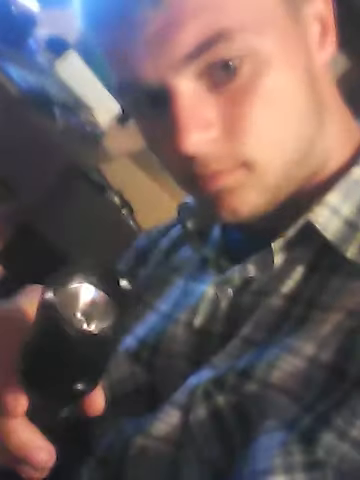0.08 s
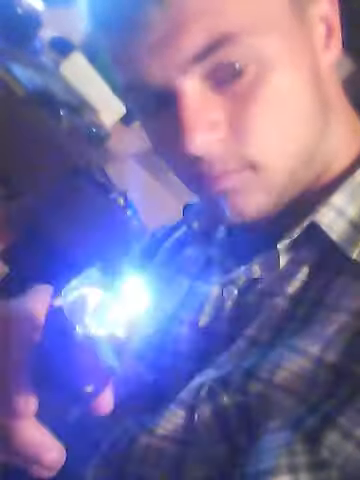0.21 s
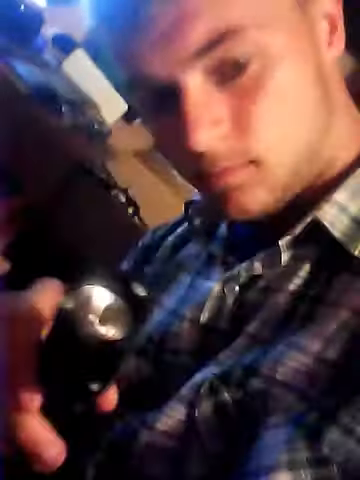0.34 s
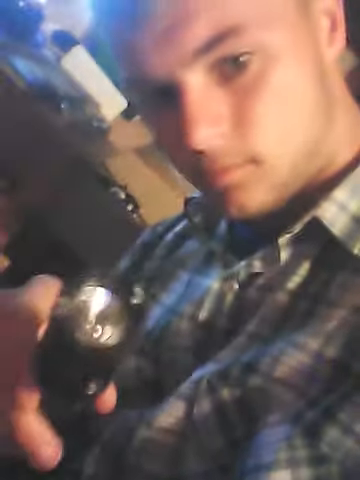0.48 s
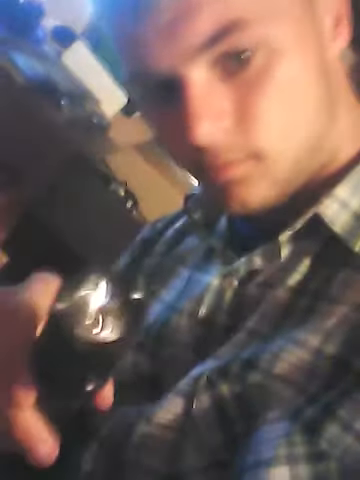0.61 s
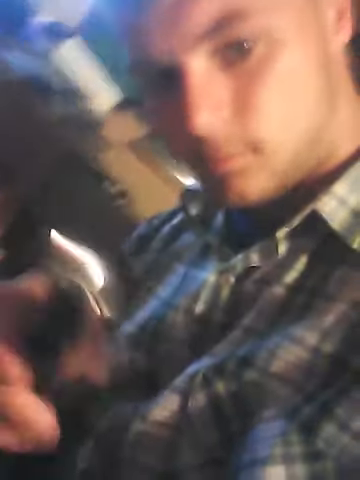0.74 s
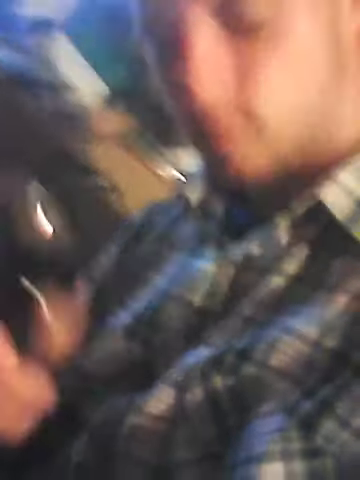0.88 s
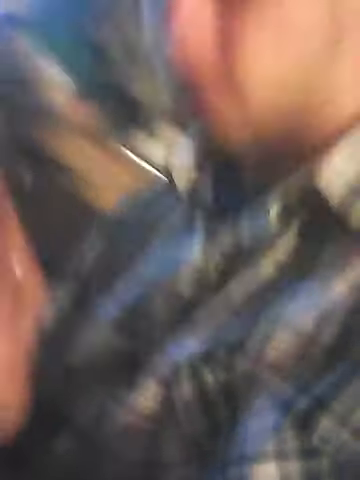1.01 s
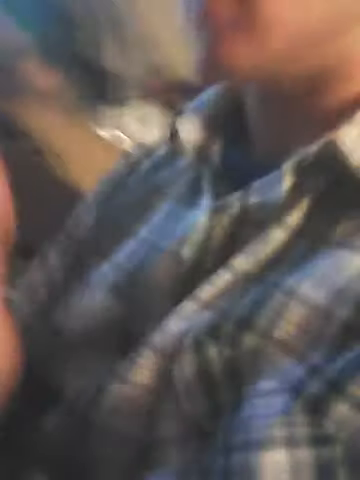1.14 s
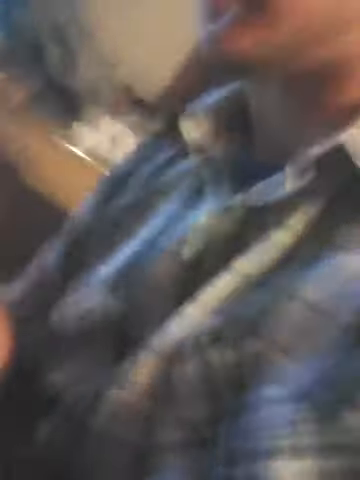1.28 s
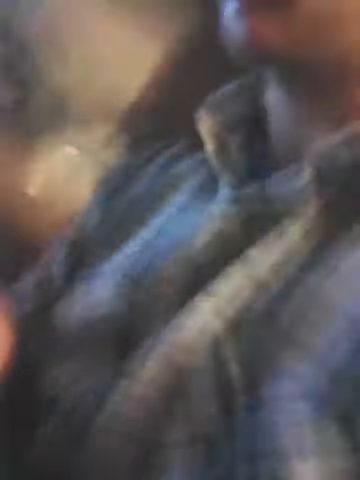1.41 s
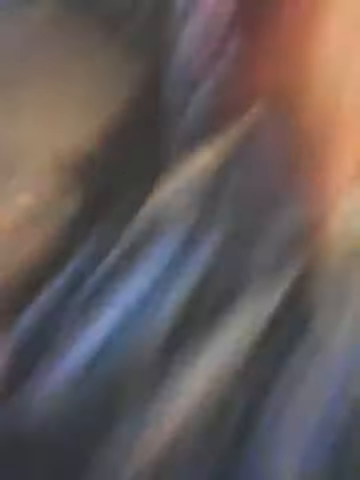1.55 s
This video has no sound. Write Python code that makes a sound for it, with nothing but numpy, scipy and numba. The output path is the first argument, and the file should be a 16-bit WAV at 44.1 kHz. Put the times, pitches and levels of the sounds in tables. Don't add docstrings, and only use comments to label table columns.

```python
import sys
import numpy as np
from scipy import signal
from scipy.fft import rfft, irfft
from scipy.io import wavfile
from scipy.ndimage import uniform_filter1d
from numba import njit

SR = 44100
rng = np.random.default_rng(int(sys.argv[2]) if len(sys.argv) > 2 else 0)


def int16_out(signal):
    q = np.round(np.clip(np.atleast_2d(signal).T, -1, 1) * 32767)
    wavfile.write(sys.argv[1], SR, q.astype(np.int16))


def elevation(decibels):
    levels = np.asarray(decibels, float)
    return 10 ** (levels / 20)


N = 70560
T = np.arange(N) / SR
F = np.maximum(np.fft.rfftfreq(N, 1 / SR), 1)
LIMIT_DB = -8.5

# start_s, level_db (over the limiter's top), snap_db, thump_db, thump_sign (signed size)
SPARK_EVENTS = [
    (0.2247, 27, 6.5, -15, -1.2),
    (0.2667, 19, -15.5, -17.5, -1),
    (0.3276, 18, -11, -19, 0.61),
]


def curve(table, hz):
    table = np.array(table)
    return np.interp(np.log(hz), np.log(table[:, 0]), table[:, 1])


def unit(x):
    return x / np.sqrt(np.mean(x ** 2))


def noise():
    return rng.standard_normal(N)


def band(x, hz, width_hz):
    return signal.lfilter(*signal.iirpeak(min(hz, .45 * SR), hz / width_hz, fs=SR), x)


def walk(rate_hz):
    hold = int(SR / rate_hz)
    steps = np.repeat(rng.standard_normal(N // hold + 1), hold)
    return 1.3 * uniform_filter1d(uniform_filter1d(steps, hold), hold)[:N]


def place(x, start_s):
    return np.concatenate([np.zeros(int(start_s * SR)), x])[:N]


def bands(table, low_hz, octaves, flicker_db, swell_db):
    out = 0
    for hz in low_hz * 2 ** np.arange(0, octaves, 1 / 3):
        shape = elevation(curve(table, F)) * np.exp(-(np.log2(F / hz) * 3) ** 2)
        out = out + irfft(rfft(noise()) * shape, N) * elevation(swell_db + flicker_db * walk(14))
    return unit(out)


def rumble(swell_db):
    # freq_hz, level_db
    rumble_colour = [(15, -54), (25, -30), (65, 2), (83, 1), (97, -6.5), (182, -2.5), (288, -10.5),
                     (313, -23), (420, -31.5), (550, -52.5), (920, -120)]
    # time_s, level_db
    rumble_level = [(0.0, -36), (0.16, -40), (0.392, -39), (0.542, -46.5), (0.734, -51.5), (0.894, -49.5),
                    (1.314, -46), (1.496, -41.5), (1.6, -46)]
    level_db = np.interp(T, *np.array(rumble_level).T)
    sound = bands(rumble_colour, 35, 3.1, 1.5, swell_db) * elevation(level_db)
    low = signal.filtfilt(*signal.butter(2, 110, fs=SR), sound)
    return sound + low * (elevation(-6) - 1)


def handling():
    # centre_s, length_s, pitch_hz, level_db
    rub_tones = [
        (.17, 0.01, 185, -31.5),
        (.49, .02, 188, -49.5),
        (.98, 0.011, 175.5, -37.5),
        (.93, 0.019, 504, -54),
        (1.15, .015, 523, -59.5),
        (1.17, 0.017, 128.7, -48),
        (1.59, 0.012, 185, -43),
    ]
    # centre_s, length_s, pitch_hz, level_db
    boom_tones = [(0.078, 0.12, 69.1, -39.5), (0.171, 0.03, 71, -36.5), (0.446, 0.035, 70.5, -39.5),
                  (0.624, 0.015, 73.8, -39), (.70, .02, 70, -47), (0.793, 0.026, 73.5, -41.5),
                  (0.931, .03, 64.6, -50), (1.03, 0.018, 77.4, -42), (1.267, 0.046, 67.2, -47),
                  (1.353, 0.015, 69.6, -46), (1.428, 0.021, 75.7, -35), (1.513, 0.033, 75, -49)]
    out = 0
    for centre_s, length_s, hz, db in [*rub_tones, *boom_tones]:
        t = T - centre_s
        out = out + elevation(db) * np.exp(-(t / length_s) ** 2) * np.sin(2 * np.pi * hz * t)
    return out


def room_air(swell_db):
    # freq_hz, level_db
    air_colour = [(180, -34.5), (300, -6), (848, -17.5), (1000, -3.5), (1110, -13.5), (2060, -18.5),
                  (5740, -43.5), (14900, -35.5), (16500, -45)]
    # freq_hz, width_hz, level_db
    air_humps = [(500, 40, -11.5), (764, 100, -4.5), (1000, 70, -6.5), (2060, 200, -6), (2550, 200, -10.5)]
    air = bands(air_colour, 350, 5.7, 4, swell_db / 2)
    humps = sum(elevation(db + 4 * walk(13)) * unit(band(noise(), hz, width_hz))
                for hz, width_hz, db in air_humps)
    air = unit(air + humps)
    early = T < SPARK_EVENTS[0][0]
    early_hiss = early * elevation(-18) * unit(band(noise(), 3500, 1200))
    return elevation(-59) * (air * elevation(2.5 * early) + early_hiss)


def room():
    swell_db = -2.5 * walk(5)
    return rumble(swell_db) + handling() + room_air(swell_db)


def echo():
    # freq_hz, t60_s
    room_decay = [(500, 0.083), (2000, 0.15), (5000, .14), (10000, .125), (16000, .11)]
    build_s, far_db, far_t60_s, far_top_hz = .004, -43, .35, 3800
    near = 0
    for hz in 350 * 2 ** np.arange(0, 5.8, .5):
        near = near + band(noise(), hz, hz / 3) * elevation(-60 * T / curve(room_decay, hz))
    far = signal.lfilter(*signal.butter(4, far_top_hz, fs=SR), noise())
    return near * (1 - .5 * np.exp(-T / build_s)) + elevation(far_db - 60 * T / far_t60_s) * far


def tick_echo():
    hz, width_hz, body_fade_s = 6040, 2260, .05
    treble_db, treble_fade_s = -4, .018
    tail = echo()
    body = band(band(tail, hz, width_hz), hz, width_hz) * 2 * np.exp(-T / body_fade_s)
    return body + elevation(treble_db) * band(tail, 11000, 5000) * np.exp(-T / treble_fade_s)


def ticks():
    # start_s, level_db, length_s, echo_db
    tick_events = [
        (1.3025, -41, .003, -3.5),
        (1.3769, -36.5, 0.0012, -7.5),
        (1.548, -53.5, 0.0026, -14),
        (1.5940, -68, 0.0016, -20),
    ]
    # freq_hz, width_hz, level_db
    plastic_modes = [
        [(800, 450, -0.5), (1700, 700, -8.5), (2940, 590, -5.5), (6100, 1400, 1.5), (9300, 520, -7.5),
         (10400, 460, -8), (11850, 900, -4.5), (14500, 2500, -9)],
        [(2960, 230, -10), (6470, 800, 4), (7030, 980, 0.5), (8900, 570, 2.5), (10060, 1100, 9.5),
         (12900, 2000, -10)],
        [(3340, 1130, -3.5), (5420, 730, 2), (9500, 5000, -16)],
        [(6200, 1500, 4), (10500, 3600, 3)],
    ]
    out = 0
    for (start_s, db, length_s, echo_db), modes in zip(tick_events, plastic_modes):
        scrape = noise() * np.exp(-(T / length_s) ** 4)
        ring = sum(elevation(mode_db) * band(band(scrape, hz, width_hz), hz, width_hz) / np.sqrt(width_hz)
                   for hz, width_hz, mode_db in modes)
        ring = ring / np.sqrt(np.mean(ring[:130] ** 2))
        out = out + elevation(db) * place(ring + elevation(echo_db) * tick_echo(), start_s)
    return out


def knocks():
    # level_db, pitch_hz, t60_s
    knock_modes = [
        (-17.5, 1090, 0.0053),
        (-35, 1950, 0.015),
        (-50, 9000, 0.0076),
        (-34.5, 1430, 0.011),
        (-64, 810, 0.016),
        (-48, 1940, 0.039),
    ]
    knock_starts = [.4973, .4977, .4975, 1.3622, 1.3027, 1.3027]
    rise = 1 - np.exp(-(T / .0008) ** 2)
    out = 0
    for start_s, (db, hz, t60_s) in zip(knock_starts, knock_modes):
        out = out + place(np.sin(2 * np.pi * hz * T) * elevation(db - 60 * T / t60_s) * rise, start_s)
    return out


def thumps():
    start_hz, end_hz, fall_s = 300, 52, .006
    lead_s, rise_s, decay_s, ring_s, ring_db = .003, .003, .002, .035, -.5
    rattle_db, rattle_hz, rattle_width_hz, rattle_s = -2.5, 850, 850, .0095
    turns = end_hz * T + (start_hz - end_hz) * fall_s * (1 - np.exp(-T / fall_s))
    late = np.maximum(T - lead_s - rise_s, 0)
    rise = np.minimum(T / (lead_s + rise_s), 1)
    decay = np.exp(-late / decay_s) + elevation(ring_db) * np.exp(-late / ring_s)
    swing = -np.sin(2 * np.pi * turns) * rise * decay
    out = 0
    for start_s, _, _, db, sign in SPARK_EVENTS:
        rattle = unit(band(noise(), rattle_hz, rattle_width_hz)) * np.exp(-(T / rattle_s) ** 4)
        thump = place(sign * swing, start_s - lead_s) + place(elevation(rattle_db) * rattle, start_s)
        out = out + thump * elevation(db)
    return out


def spark_filter():
    # freq_hz, level_db
    spark_colour = [(240, -29.5), (400, -33.5), (1310, -14), (2050, -8.5), (2550, -11), (6900, -5),
                    (15000, -2.5), (15700, -6.5), (16500, -38)]
    grid_hz = np.geomspace(100, 22000, 60)
    gains = elevation(curve([(100, -60), *spark_colour], grid_hz))
    taps = signal.firwin2(255, [0, *grid_hz, SR / 2], [0, *gains, 0], fs=SR)
    return signal.minimum_phase(np.convolve(taps, taps), method="homomorphic")


def sparks():
    # freq_hz, width_hz, level_db
    spark_peaks = [(2050, 260, -13.5), (2560, 300, -14), (6820, 470, -4.5), (9020, 500, -1)]
    snap_s, echo_db, fresh_share = .00045, -13, .5
    grain_db, grain_rate_hz, low_edge_hz = 2.5, 14000, 1100
    colour, shared = spark_filter(), echo()
    low_cut = signal.butter(2, low_edge_hz, "high", fs=SR)
    out = 0
    for start_s, db, snap_db, _, _ in SPARK_EVENTS:
        snap = np.diff(rng.standard_normal(N + 1)) * np.exp(-(T / snap_s) ** 2) * elevation(snap_db)
        tail = shared * np.sqrt(1 - fresh_share) + echo() * np.sqrt(fresh_share)
        tail = tail * elevation(echo_db + grain_db * walk(grain_rate_hz))
        sound = signal.lfilter(*low_cut, signal.lfilter(colour, 1, snap + tail))
        sound = sound + sum(elevation(peak_db) * band(sound, hz, width_hz)
                            for hz, width_hz, peak_db in spark_peaks)
        out = out + place(sound, start_s) * elevation(db + LIMIT_DB - echo_db)
    return out


@njit
def follow(x, release):
    y, e = np.empty(len(x)), 0.
    for i in range(len(x)):
        e = max(x[i], e + (x[i] - e) * release)
        y[i] = e
    return y


def limiter(x):
    lookahead_s, sense_s, release_s = .0012, .0025, .004
    k = int(lookahead_s * SR)
    ahead = 2 * k + k // 2
    power = signal.lfilter([1 / (sense_s * SR)], [1, 1 / (sense_s * SR) - 1], x ** 2)
    power = np.concatenate([power[ahead:], power[-ahead:]])
    level = follow(np.sqrt(power), 1 / (release_s * SR))
    return x * uniform_filter1d(np.minimum(1, elevation(LIMIT_DB) / (level + 1e-9)), k)


def scene():
    near = sparks() + ticks() + knocks()
    near = near - .7 * band(near, 8300, 500)
    return (limiter(near + room()) + thumps())[None]


def roll_off(x):
    return signal.sosfilt(signal.butter(12, 17020, fs=SR, output="sos"), x)


def record(dry):
    x = .76 * np.tanh(dry / .76)
    top_cut = signal.ellip(8, .2, 60, 15900, fs=SR, output="sos")
    return roll_off(signal.sosfilt(top_cut, x))


dry = scene()
out = record(dry)
int16_out(out)
```